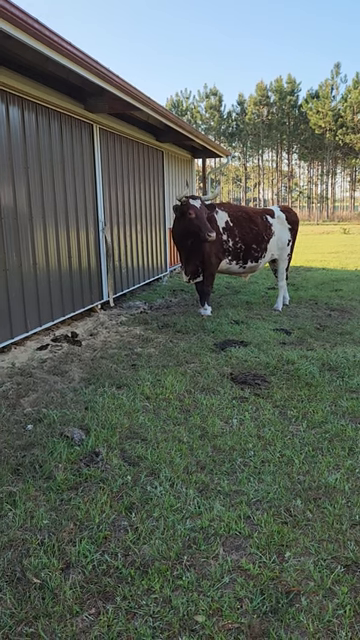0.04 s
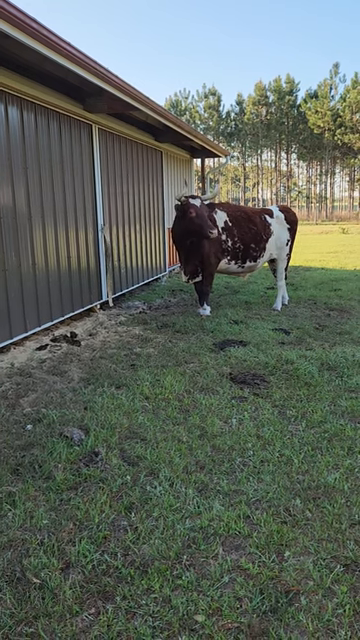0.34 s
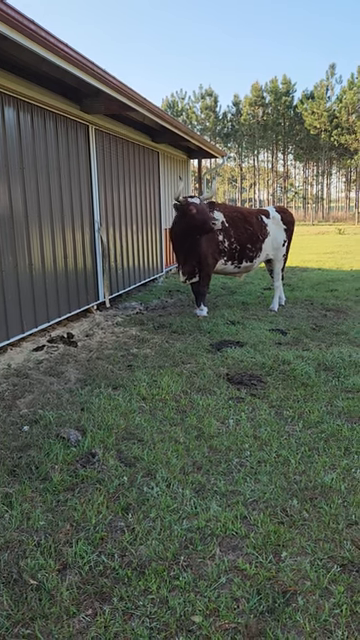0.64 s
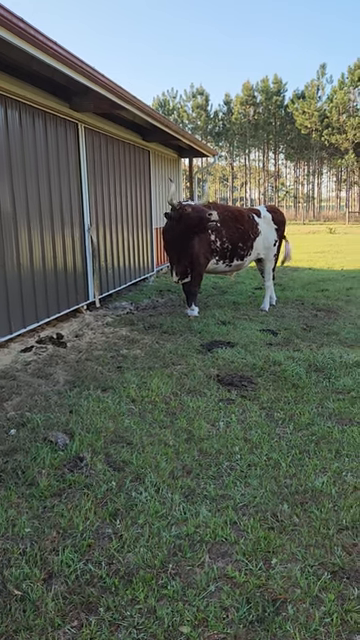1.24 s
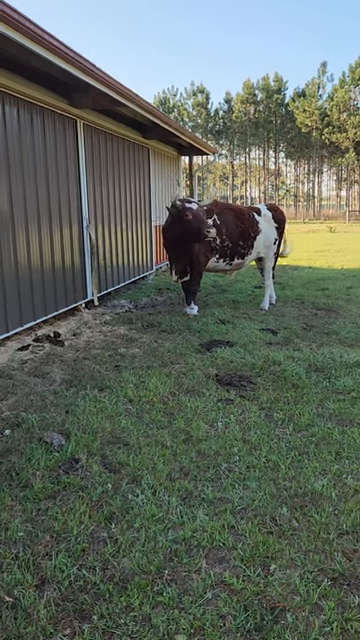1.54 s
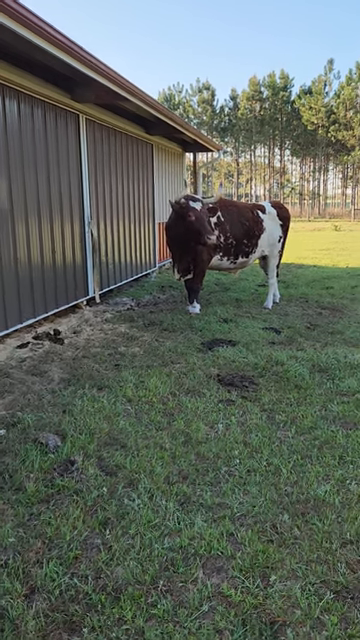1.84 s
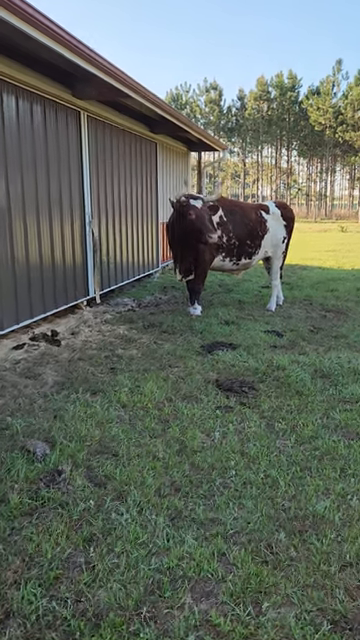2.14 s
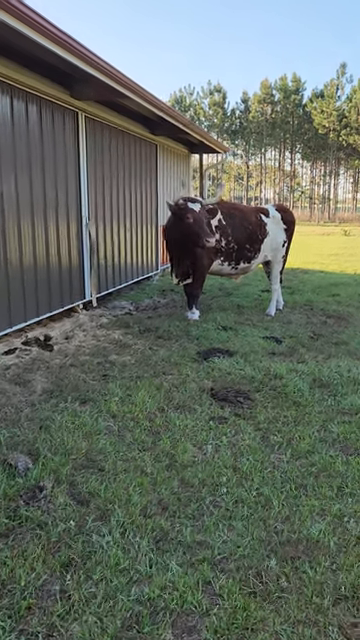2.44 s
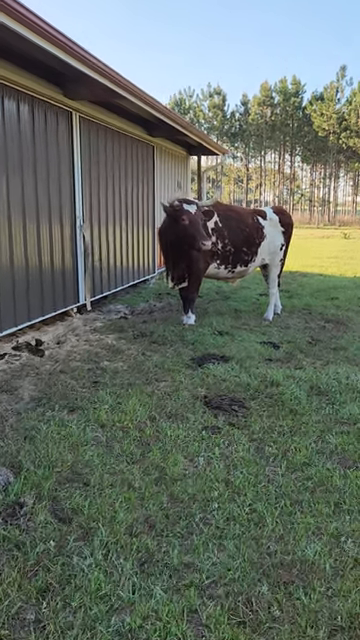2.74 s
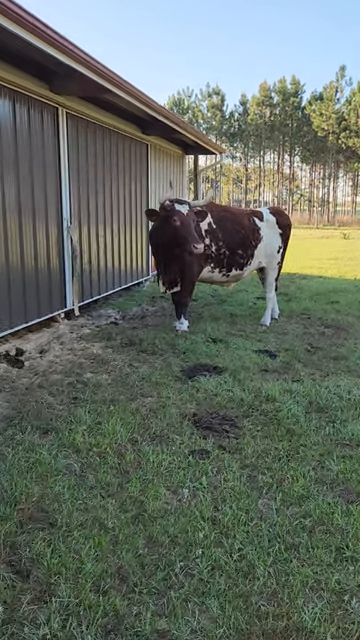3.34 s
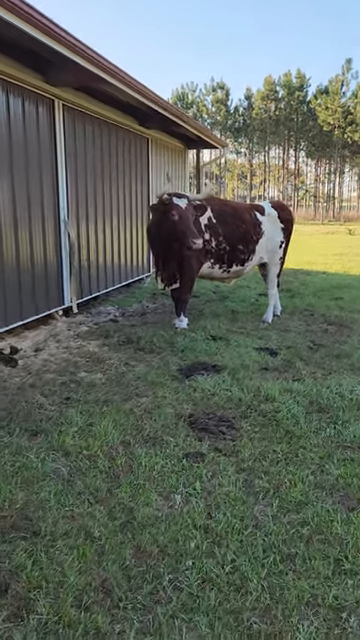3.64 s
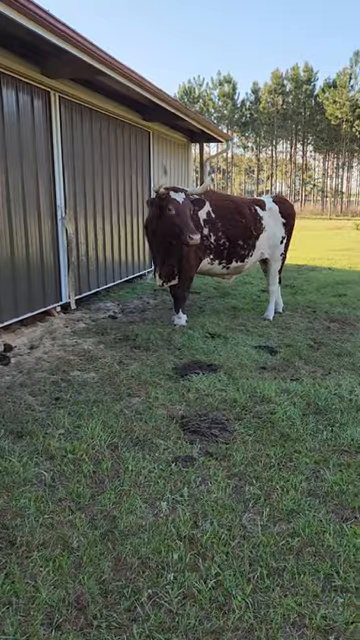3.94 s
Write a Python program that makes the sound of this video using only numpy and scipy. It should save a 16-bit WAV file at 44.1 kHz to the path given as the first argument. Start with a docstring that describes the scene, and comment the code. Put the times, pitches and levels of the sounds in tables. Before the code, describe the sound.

Beside a barn in an open field, a bovine gives a closed-mouth hum, then a harsh, airy bellow and a grunt that sinks into its chest. Birds whistle far off, grass snaps briefly and soft wind rumbles on the microphone.

```python
"""Field beside a steel barn. Light wind rumbles and hushes, birds call far off, grass crackles briefly.
An ox hums with closed mouth on a rising pitch, breaks into a hoarse, almost voiceless bellow and ends
on a rattling grunt that drops back into the chest. Vocal fold pulses ring in the closed head (hum) or,
with much air noise, in the throat (bellow, grunt). The barn wall answers with a short echo."""
import sys
import numpy as np
from scipy import signal
from scipy.io import wavfile
from scipy.ndimage import uniform_filter1d

SR = 44100
rng = np.random.default_rng(int(sys.argv[2]) if len(sys.argv) > 2 else 0)


def store_wav(level_fs):
    """Save 16-bit WAV to argv[1]."""
    pcm = np.round(np.clip(np.atleast_2d(level_fs), -1, 1) * 32767)
    wavfile.write(sys.argv[1], SR, pcm.T.astype(np.int16))


N = 176400
TIME_S = np.arange(N) / SR

# wind and grass envelopes: t/s, level/dB
RUMBLE_LEVEL = [(0, -51.5), (2.6, -48), (2.665, -43.5), (2.73, -53.5), (3.03, -42.5), (3.2, -46.5),
                (4, -48)]
HUSH_LEVEL = [(2.55, -66.5), (3.0, -55.5), (3.3, -61), (3.7, -54.5), (4, -48.5)]
RUSTLE_LEVEL = [(1.6, -100), (2.0, -72), (2.27, -78.5), (2.41, -67), (2.6, -77), (3.25, -84.5), (3.37, -71),
                (3.68, -89), (3.95, -67.5)]
# noise spectra: f/Hz, relative density/dB
RUMBLE_SPECTRUM = [(20, -3), (68, 11), (120, 0.5), (500, -48.5)]
STEADY_AIR_SPECTRUM = [(330, -7), (700, 2), (1300, -6), (2500, -28.5), (14000, -49.5)]
HUSH_SPECTRUM = [(300, -19), (600, 1), (850, 0.5), (1600, -38)]
RUSTLE_SPECTRUM = [(1500, 6), (2500, 3), (6000, -6.5), (7900, 3.5), (13000, -41.5)]
MOUTH_HISS_SPECTRUM = [(3000, -3.5), (4600, 4.5), (5800, -5.5), (7300, 0.5), (10000, -7.5), (15000, -18.5)]
# slurred bird whistles: t/s, length/s, start f/Hz, end f/Hz, level/dB
BIRD_WHISTLES = [(0.188, 0.12, 2880, 2420, -68), (0.273, 0.15, 2454, 2617, -63.5),
                 (0.367, 0.063, 2500, 2000, -67), (0.43, 0.094, 2236, 2810, -64),
                 (0.62, 0.12, 2610, 2156, -69.5), (0.949, 0.064, 2720, 2190, -72.5),
                 (2.203, 0.077, 2760, 2080, -69)]
# thin bird chips: t/s, f/Hz, relative level/dB
BIRD_CHIPS = [(0.194, 7560, -70.5), (3.296, 7380, -66)]
# snaps in the grass: t/s, relative level/dB
GRASS_SNAPS = [(2.425, -46), (2.435, -42), (2.465, -30), (2.4922, -39)]

# closed-mouth hum: t/s, pitch f/Hz, chest level/dB, nasal level/dB
HUM_CURVE = [(.325, 64, -60, -70), (.37, 68, -36, -56), (.66, 84, -36, -52), (.765, 112, -42, -54),
             (.788, 155, -43, -47), (.822, 163, -41, -48), (.865, 178, -60, -72)]
# bellow: t/s, throat level/dB, brightness/dB, hiss level/dB
BELLOW_CURVE = [(.97, -67.5, 27, -84), (1.04, -57, 6, -74.5), (1.171, -52.5, -12.5, -70.5),
                (1.179, -39, -18, -77), (1.2, -44.5, -0.5, -70), (1.345, -41.5, -3, -65.5),
                (1.385, -42, -3, -61), (1.64, -39.5, 0, -58.5), (1.715, -45.5, -3, -65.5),
                (1.755, -65.5, -9, -80)]
# grunt rattle: t/s, level/dB, brightness/dB
GRUNT_CURVE = [(1.765, -70, -16), (1.80, -47.5, -9), (1.86, -42.5, 3), (1.912, -36, 1.5),
               (1.95, -46.5, -4.5), (1.963, -31.5, -4.5), (1.986, -33, -12), (2.015, -44, -10),
               (2.08, -47.5, -9), (2.24, -67.5, -14), (2.365, -46.5, -12), (2.42, -57.5, -11)]
# grunt chest tone: t/s, f/Hz, level/dB
CHEST_CURVE = [(1.905, 150, -53), (1.966, 182, -35), (2.016, 181, -38), (2.075, 126, -51),
               (2.122, 112, -44), (2.17, 108, -62)]
# resonances of closed head, open throat, narrowing throat: f/Hz, width/Hz, relative level/dB
HEAD_MODES = [(198, 92, -3.5), (391, 26, -5.5), (452, 47, -3), (609, 77, 3.5)]
OPEN_THROAT_MODES = [(184.3, 36.3, -4), (369, 42, -7.5), (584, 104, 1.5), (693, 31, -11.5),
                     (1048, 165, -2.5), (1593, 190, -9), (2033, 127, -13.5), (2187, 42, -7),
                     (2413, 355, -15), (3080, 110, -19)]
NARROW_THROAT_MODES = [(173.4, 59, -0.5), (551, 134, -5), (611, 87, 2), (723, 86, -7.5), (1155, 290, -9.5),
                       (1742, 63, -15), (3016, 240, -26)]


def from_db(db):
    """Decibels to gain."""
    return 10 ** (np.asarray(db) / 20)


def unit_rms(x):
    """Scale to unit power."""
    return x / np.sqrt(np.mean(x ** 2) + 1e-20)


def flatten(x, window_samples):
    """Hold the running power at 1."""
    return x / np.sqrt(uniform_filter1d(x ** 2, size=window_samples) + 1e-12)


def per_sample(curve):
    """Each value column of a curve at every sample."""
    t_s, *columns = np.transpose(curve)
    return [np.interp(TIME_S, t_s, column) for column in columns]


def gate(curve):
    """1 while a curve lasts, 10 ms exponential skirts outside."""
    outside_s = np.maximum(curve[0][0] - TIME_S, TIME_S - curve[-1][0])
    return np.exp(-np.maximum(0, outside_s) / .01)


def pan(left_db):
    """Left gain up, right gain down."""
    return from_db([[left_db], [-left_db]])


def delay(x, lag_s):
    """Fractional delay."""
    return np.interp(TIME_S - lag_s, TIME_S, x)


def butter(x, hz, kind, order=2):
    """Butterworth filter."""
    sections = signal.butter(order, np.clip(hz, 10, .45 * SR), kind, fs=SR, output="sos")
    return signal.sosfilt(sections, x)


def resonate(x, hz, width_hz):
    """Fourth-order resonance, peak gain 1."""
    r = np.exp(-np.pi * width_hz * np.sqrt(2) / SR)
    gain = (1 - r * r) / 2
    section = [gain, 0, -gain, 1, -2 * r * np.cos(2 * np.pi * hz / SR), r * r]
    return signal.sosfilt([section, section], x)


def drift(corner_hz):
    """Slow random wander, RMS 1."""
    hop, settle = 40, 2000
    r = np.exp(-2 * np.pi * corner_hz * hop / SR)
    white = rng.standard_normal(N // hop + settle + 2)
    slow = signal.lfilter([1], [1, -2 * r, r * r], white)[settle:]
    return np.interp(np.arange(N) / hop, np.arange(len(slow)), unit_rms(slow))


def cycles(hz, jitter):
    """Running cycle count at an unsteady pitch."""
    return np.cumsum(hz * (1 + jitter * drift(39.41))) / SR


def banded_noise(spectrum, flicker_db, correlation):
    """Stereo noise in separately flickering third-octave bands, RMS 1."""
    points_hz, points_db = np.transpose(spectrum)
    edges_hz = 20 * 2 ** (np.arange(30) / 3)
    white = rng.standard_normal((2, 2, N))
    noise = 0
    for k, (low_hz, high_hz) in enumerate(zip(edges_hz, edges_hz[1:])):
        if high_hz < points_hz[0] or low_hz > points_hz[-1]:
            continue
        mid, side = butter(white[k % 2], [low_hz, high_hz], "band")
        band = np.sqrt(1 + correlation) * mid + np.sqrt(1 - correlation) * side * [[1], [-1]]
        band_db = np.interp(np.log(low_hz * high_hz) / 2, np.log(points_hz), points_db)
        noise = noise + from_db(band_db + flicker_db * drift(19.2)) * band
    return unit_rms(noise)


def echoes(x, t60_s, count=60):
    """Scattered decaying reflections, different at each ear."""
    ears = []
    for lags_s, signs in zip(rng.uniform(.004, t60_s, (2, count)), rng.choice([-1, 1], (2, count))):
        taps = np.zeros(int(lags_s.max() * SR) + 1)
        taps[(lags_s * SR).astype(int)] = signs * from_db(-60 * lags_s / t60_s)
        ears.append(signal.fftconvolve(x, taps / np.linalg.norm(taps))[:N])
    return butter(np.array(ears), 16000, "low")


def wind():
    """Low rumble, steady air and a far hush that reaches the right side first."""
    rumble = banded_noise(RUMBLE_SPECTRUM, flicker_db=1.5, correlation=.96)
    rumble *= from_db(per_sample(RUMBLE_LEVEL)[0])
    air = from_db(-63) * banded_noise(STEADY_AIR_SPECTRUM, flicker_db=.7, correlation=.6)
    hush = banded_noise(HUSH_SPECTRUM, flicker_db=3.5, correlation=.38)
    hush *= from_db(per_sample(HUSH_LEVEL)[0])
    hush[0] = delay(hush[0], lag_s=.00043)
    return rumble * pan(left_db=-.4) + air + hush * pan(left_db=2)


def birds(waver=.009, chip_decay_s=.04, echo_db=-4):
    """Far whistles and high chips, blurred by trees."""
    song = np.zeros(N)
    for t_s, length_s, start_hz, end_hz, db in BIRD_WHISTLES:
        progress = np.clip((TIME_S - t_s) / length_s, 0, 1)
        hz = start_hz + (end_hz - start_hz) * progress
        song += from_db(db) * np.sin(np.pi * progress) * np.sin(2 * np.pi * cycles(hz, waver))
    for t_s, hz, db in BIRD_CHIPS:
        age = np.maximum(TIME_S - t_s, 0) / chip_decay_s
        envelope = np.minimum(6 * age, 1) * np.exp(-age)
        song += from_db(db) * envelope * np.sin(2 * np.pi * cycles(hz, waver))
    return song + from_db(echo_db) * echoes(song, t60_s=.49)


def grass(snap_decay_s=.0015, snap_band_hz=(2760, 8900)):
    """Soft rustle and a few dry snaps close by."""
    envelope = sum(from_db(db) * (TIME_S >= t_s) * np.exp(-np.abs(TIME_S - t_s) / snap_decay_s)
                   for t_s, db in GRASS_SNAPS)
    snaps = from_db(-2.5) * butter(envelope * rng.standard_normal((2, N)), snap_band_hz, "band")
    rustle = banded_noise(RUSTLE_SPECTRUM, flicker_db=1, correlation=.1)
    return snaps + from_db(per_sample(RUSTLE_LEVEL)[0]) * rustle


def barn_echo(x, low_cut_hz=380, level_db=-11):
    """Short, bass-light reflections off the steel wall."""
    return from_db(level_db) * echoes(butter(x, low_cut_hz, "high"), t60_s=.27)


def closures(turns):
    """One click each time the vocal folds shut."""
    return np.diff(np.floor(turns), prepend=0)


def rough_voice(modes, bright_db, flap_hz, jitter, air_share, chop_depth=.16, bright_above_hz=900):
    """Uneven fold closures and chopped air ring in the throat; an open mouth lifts the upper modes."""
    turns = cycles(flap_hz, jitter)
    pulses = unit_rms(closures(turns) * np.exp(jitter * drift(110)))
    jet = unit_rms(rng.standard_normal(N) * (1 + chop_depth * np.cos(2 * np.pi * turns)))
    source = np.sqrt(1 - air_share) * pulses + np.sqrt(air_share) * jet
    voice = np.zeros(N)
    for k, (hz, width_hz, db) in enumerate(modes):
        mode_db = db + bright_db * (hz > bright_above_hz) + 2 * drift(7.7)
        voice += (-1) ** k * from_db(mode_db) * resonate(source, hz, width_hz)
    return flatten(voice, window_samples=1100)


def hum(nasal_top_hz=754, rasp_band_hz=(2950, 5540), rasp_db=-24):
    """Clean chest fundamental, overtones buzzing through the nose, faint nostril rasp."""
    hz, chest_db, nasal_db = per_sample(HUM_CURVE)
    turns = cycles(hz, jitter=.017)
    chest = np.sqrt(2) * np.sin(2 * np.pi * turns)
    pulses = closures(turns)
    head = sum(from_db(db) * resonate(pulses, mode_hz, width_hz) for mode_hz, width_hz, db in HEAD_MODES)
    nasal = flatten(butter(head, nasal_top_hz, "low", order=4), window_samples=1800)
    breath = rng.standard_normal(N) * (1 + np.cos(2 * np.pi * turns))
    rasp = from_db(rasp_db) * unit_rms(butter(breath, rasp_band_hz, "band", order=4))
    return (from_db(chest_db) * chest + from_db(nasal_db) * (nasal + rasp)) * gate(HUM_CURVE)


def mouth_hiss():
    """The bellow's air hisses over tongue and lips."""
    _, _, hiss_db = per_sample(BELLOW_CURVE)
    hiss = banded_noise(MOUTH_HISS_SPECTRUM, flicker_db=2.9, correlation=.048)
    return from_db(hiss_db) * gate(BELLOW_CURVE) * hiss * pan(left_db=2.5)


def bellow():
    """Air forced past slack folds into the open throat."""
    throat_db, bright_db, _ = per_sample(BELLOW_CURVE)
    voice = rough_voice(OPEN_THROAT_MODES, bright_db, flap_hz=87.55, jitter=.28, air_share=.92)
    return from_db(throat_db) * gate(BELLOW_CURVE) * voice


def grunt():
    """The folds rattle, catch on a clear low note and let go."""
    rattle_db, bright_db = per_sample(GRUNT_CURVE)
    rattle = rough_voice(NARROW_THROAT_MODES, bright_db, flap_hz=89.67, jitter=.41, air_share=.94)
    chest_hz, chest_db = per_sample(CHEST_CURVE)
    chest = np.sqrt(2) * np.sin(2 * np.pi * cycles(chest_hz, jitter=.0048))
    return from_db(rattle_db) * gate(GRUNT_CURVE) * rattle + from_db(chest_db) * gate(CHEST_CURVE) * chest


def scene():
    """Ox slightly left, barn echo, field around."""
    ox = hum() + bellow() + grunt()
    direct = np.array([ox, delay(ox, lag_s=.0001)]) * pan(left_db=.34)
    return direct + barn_echo(ox) + mouth_hiss() + birds() + grass() + wind()


def record(dry):
    """Steep low-pass at 15.6 kHz."""
    return signal.sosfilt(signal.ellip(10, .1, 70, 15600, fs=SR, output="sos"), dry)


dry = scene()
out = record(dry)
store_wav(out)
```